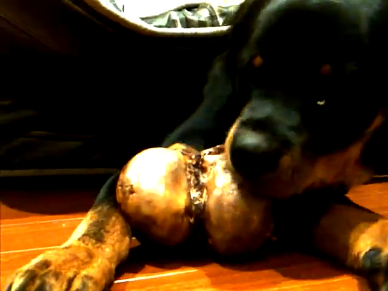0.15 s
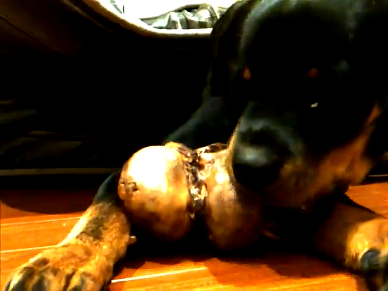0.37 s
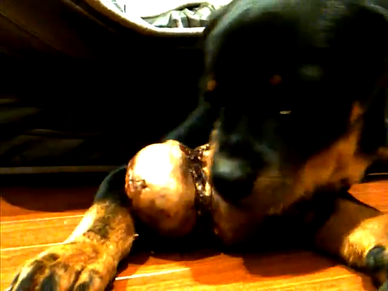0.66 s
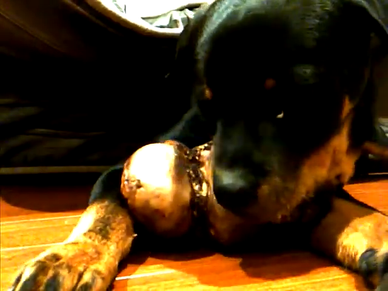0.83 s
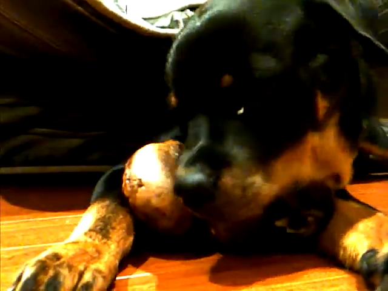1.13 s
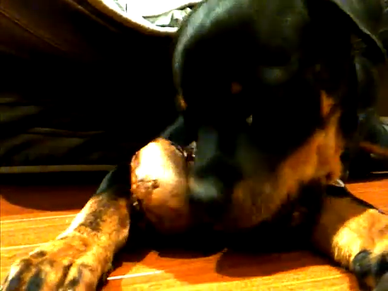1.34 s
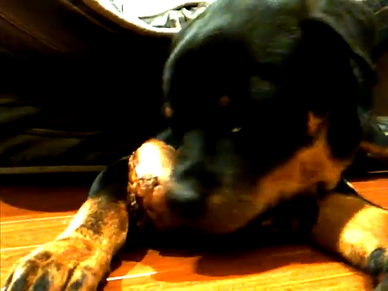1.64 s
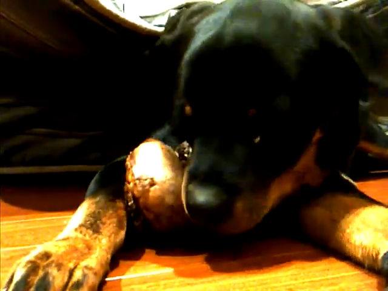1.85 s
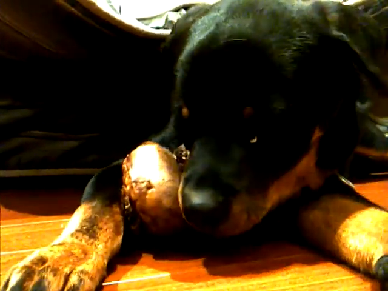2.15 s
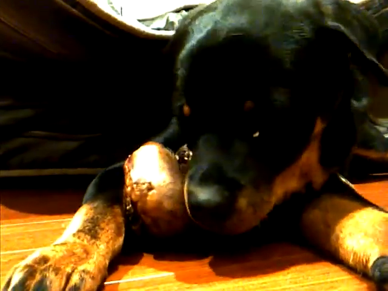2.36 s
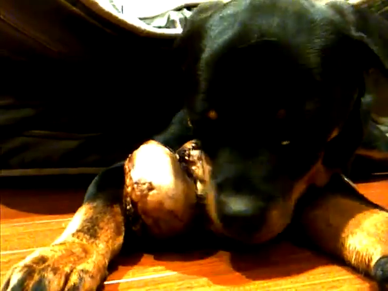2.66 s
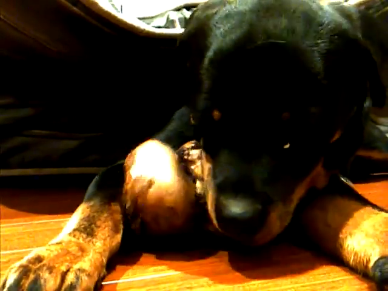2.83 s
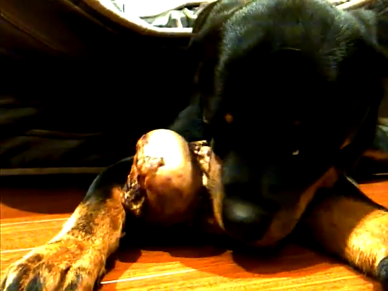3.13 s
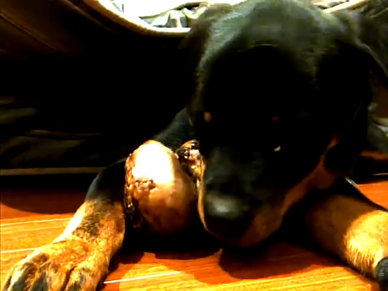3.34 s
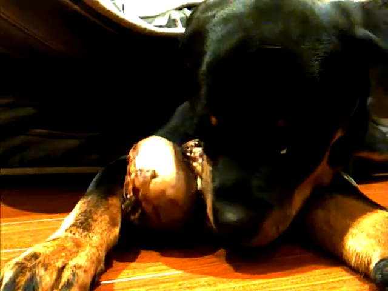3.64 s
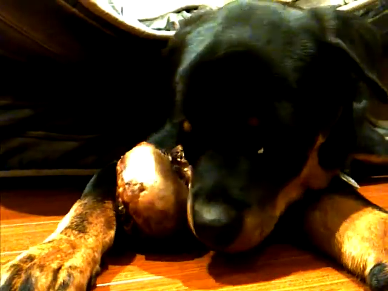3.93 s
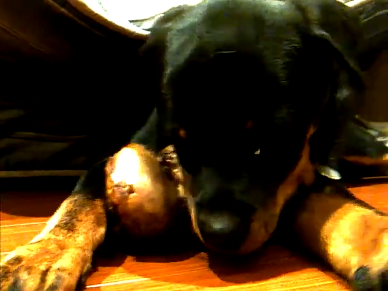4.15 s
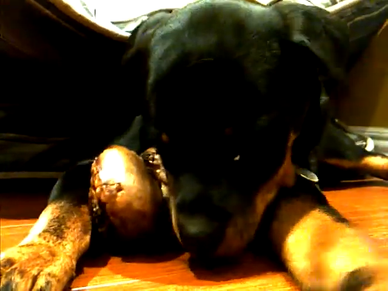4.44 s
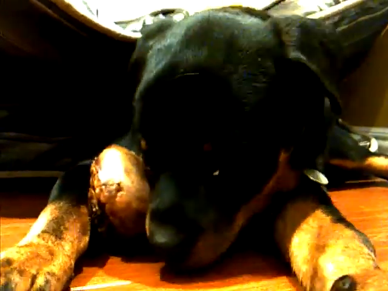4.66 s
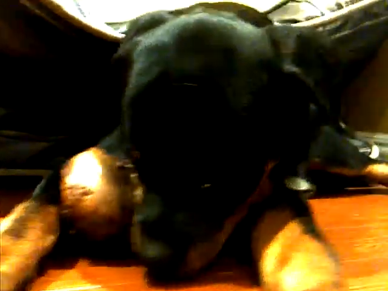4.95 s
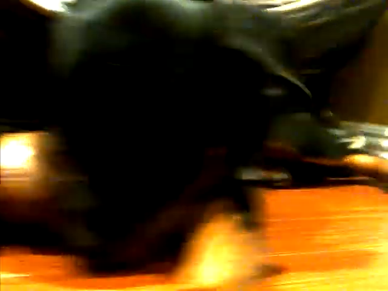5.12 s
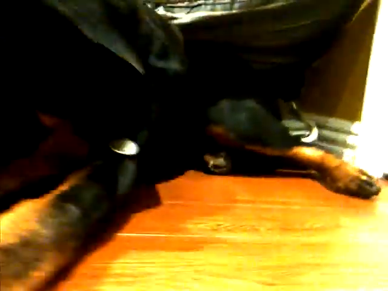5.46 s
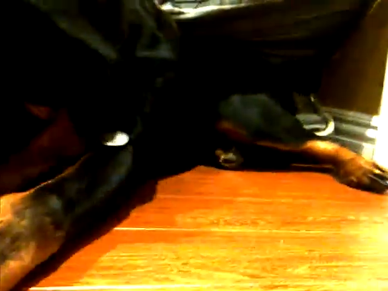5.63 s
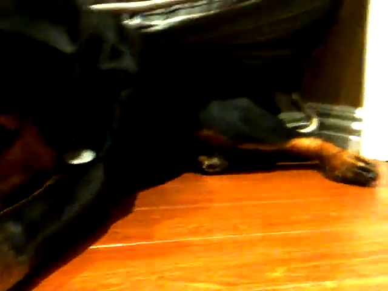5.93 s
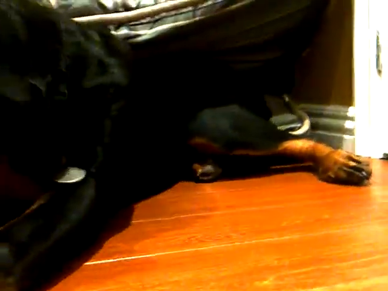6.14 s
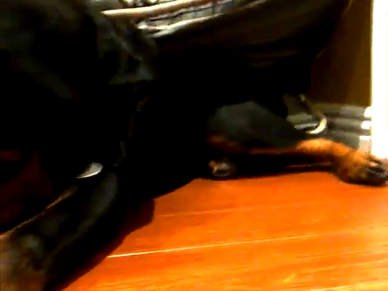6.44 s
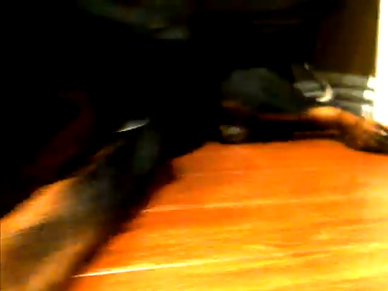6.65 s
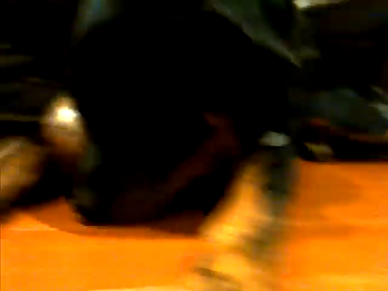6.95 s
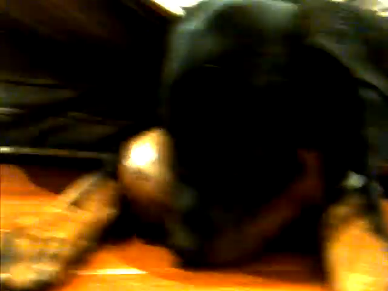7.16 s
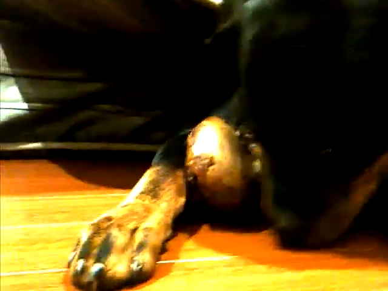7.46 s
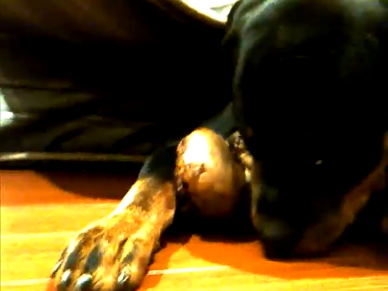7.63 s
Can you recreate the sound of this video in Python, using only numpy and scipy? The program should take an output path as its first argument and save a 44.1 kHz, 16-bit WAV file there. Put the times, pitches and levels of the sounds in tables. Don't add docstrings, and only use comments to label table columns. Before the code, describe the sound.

A young dog chews a large knuckle bone on a laminate floor in a small room. Hollow clunks strike the boards irregularly, loudest from about three to four and a half seconds, between short grinding scrapes, tooth ticks and claw skids. A collar tag tinkles faintly. Later it is sparser, with soft hiss as the camera slides. Close, cheap microphone with dull treble.

```python
import sys
import numpy as np
from scipy import signal
from scipy.fft import rfft, irfft, next_fast_len
from scipy.io import wavfile

SR = 44100
rng = np.random.default_rng(int(sys.argv[2]) if len(sys.argv) > 2 else 0)


def wrap_up_sound(samples):
    columns = np.atleast_2d(samples).T
    tamed = np.clip(columns, -1, 1)
    steps = np.round(tamed * 32767).astype(np.int16)
    wavfile.write(sys.argv[1], SR, steps)


def to_linear_factor(level_db):
    exponent = np.asarray(level_db, float) / 20
    return 10 ** exponent


N = 343539


# start_s, peak_db, thump_db, hardness_db
DROPS = [(.153, -25.5, -14.5, -21.5), (.659, -39, -9, -27), (.696, -25.5, -13.5, -22.5),
         (1.14, -34, -7.5, -18), (1.21, -18, -39, -16.5), (1.378, -12, -23, -18),
         (1.455, -17.5, -17, -19.5), (2.06, -42.5, -11.5, -32), (2.277, -37, -12.5, -24),
         (2.671, -19, -16, -20), (2.907, -29.5, -16, -16), (3.296, -5, -25, -13.5),
         (3.598, -24.5, -6.5, -16.5), (3.85, -4.5, -16, -15.5), (4.073, -21, -12, -22),
         (4.381, -4.5, -20, -16.5), (5.077, -29, -20, -23), (5.553, -27, -6, -19), (6.852, -26, -24, -17),
         (6.871, -31, -26, -26), (7.428, -21, -9.5, -13)]
NUDGES = [(.194, -48, -1, -11), (.344, -35, -4, -47), (.379, -49, -9, -31), (.596, -46, -4, -26),
          (.77, -38.5, -2, -26), (.979, -50, -4, -12.5), (1.077, -54.5, 4.5, -32), (1.323, -37.5, -4, -3.5),
          (1.342, -31.5, -1, -23), (1.407, -33.5, .5, -20), (1.821, -48, -27, -4), (1.846, -41, -6, -17),
          (1.858, -42, -1, -12), (4.239, -44.5, 3, -6), (4.246, -36.5, -.5, -5.5), (4.27, -56, -15, -8),
          (4.987, -45, -4, -10), (5.054, -31.5, 5, -13.5), (5.212, -40.5, -4.5, -18),
          (6.163, -45, -5.5, -6.5), (6.33, -58, -11, -12), (6.658, -28.5, -8, -6.5),
          (7.634, -45, -3.5, -12.5)]
BITES = [(.216, -35, -14, -12), (.263, -34, -7.5, -16), (.3115, -29.5, -14, -7.5), (1.784, -49, 2.5, -35),
         (1.928, -45.5, -5, -3.5), (1.97, -43, -5.5, -5), (2.38, -47.5, -5.5, -10), (2.891, -45, -2, -2.5),
         (4.172, -30.5, -8.5, -16), (4.193, -46, -6, 3), (4.287, -35.5, -18, -7), (4.347, -39.5, 4.5, -11),
         (4.769, -43.5, -4.5, -11), (4.866, -49, -2, 1.5), (6.277, -38.5, -1.5, -17),
         (6.397, -45.5, -11, -3), (6.492, -37.5, -4, 2.5), (6.639, -47, -20, -17)]
# shaft_db at hardness 0, follows (dB per dB of hardness)
KINDS = [
    (-5.5, .75),
    (-17.5, .1),
    (-5.5, .15),
]


def blows():
    rows = []
    for kind, (shaft_db, follows) in zip((DROPS, NUDGES, BITES), KINDS):
        rows += [(*row, shaft_db + follows * row[3]) for row in kind]
    return sorted(rows)


BOARD = [(187.9, -6, 0.066), (251, -2.5, 0.046), (310.4, 3, 0.017)]
BONE = [(411, 1.5, 0.039), (466, 1.5, 0.022), (501.4, -1.5, 0.024)]
SHAFT = [(579, -2, 0.04), (677, 2, 0.036), (715, 4.5, 0.027), (839, 1, 0.0092)]
CONTACT = [(1082, 3, 0.0082), (1246.4, 8.5, 0.0087), (1474, 5.5, 0.0043), (1630, -17, 0.0048),
           (1950, -31.5, 0.004), (2600, -37, 0.023), (3560, -20.5, 0.0027)]
# start_s, peak_db
CRACKS = [(.216, -58), (.263, -62), (.309, -63.5), (.696, -61.5), (1.323, -60.5), (1.455, -55.5),
          (1.784, -54.5), (1.858, -62), (1.928, -60), (2.277, -65), (2.671, -46), (2.907, -54),
          (3.296, -37), (3.598, -54.5), (3.85, -43), (4.193, -67), (4.246, -55.5), (4.287, -63.5),
          (4.381, -29), (4.866, -61), (4.987, -63), (5.077, -63), (5.212, -54), (6.163, -64), (6.492, -52),
          (6.852, -52), (6.871, -57), (7.428, -48)]


def knocks():
    lag_s, spread_db = .0048, 2.2
    s, peak_db, thump_db, hard_db, shaft_db = np.transpose(blows())
    crack_s, crack_db = np.transpose(CRACKS)
    s = s + lag_s
    soft_db = np.minimum(0, .6 * (peak_db + 30))
    thump = band(struck(BOARD, s, peak_db + thump_db + 5.5, spread_db), 140, 600)
    knuckle = struck(BONE, s, peak_db - 10, spread_db)
    shaft = struck(SHAFT, s, peak_db + shaft_db - 2.5, spread_db)
    hollow = band(knuckle + shaft, 240, 940)
    hard = band(struck(CONTACT, s, peak_db + hard_db + soft_db, spread_db), 700, 2200)
    rough = chatter(s, peak_db + hard_db + 7, .061, 900, 1700)
    crack = band(chatter(crack_s + lag_s, crack_db + 4, .03, 2200, 5000), 1800, 6000)
    return thump + hollow + hard + rough + crack


# time_s, level_db
EFFORT = [(0, -52), (.6, -60), (.9, -80), (1.15, -68), (1.66, -59), (1.95, -62), (2.2, -62), (2.58, -70),
          (3.15, -68), (3.6, -55), (3.8, -64), (4.7, -56), (5.2, -60), (5.75, -55), (6.0, -63), (6.75, -58),
          (7.35, -60), (7.79, -59)]


def effort():
    s, db = np.transpose(EFFORT)
    return to_linear_factor(np.interp(np.arange(N) / SR, s, db))


# middle_s, level_db, width_s (per 20 dB either side)
GRINDS = [(.13, -51, .1), (.43, -40, .12), (.79, -43, .09), (1.17, -51, .06), (1.34, -39, .035),
          (2.72, -50, .15), (3.0, -56, .15), (3.5, -37, .12), (3.97, -47, .15), (4.07, -42.5, .2),
          (4.2, -48.5, .2), (4.5, -41, .12), (4.65, -51, .1), (5.76, -51, .12), (6.57, -50, .1),
          (6.92, -50, .15), (7.24, -49, .12), (7.79, -49, .12)]


def grinding():
    jaw = effort() + bouts(GRINDS)
    slips = grains(600, 3.6, 4.2)
    grind = rubbed(BONE + SHAFT + CONTACT, slips, .42)
    return to_linear_factor(-7) * jaw * rms_one(band(grind, 230, 1500))


# middle_s, level_db, width_s (per 20 dB either side)
SHUFFLES = [(.13, -38, .12), (.47, -40, .15), (.74, -44, .07), (1.23, -33, .045), (1.43, -37, .055),
            (1.89, -41, .07), (2.28, -51, .15), (2.75, -42, .1), (3.33, -26, .06), (3.57, -46, .07),
            (4.19, -40, .09), (4.76, -46, .07), (5.01, -54, .2), (5.82, -48, .12), (6.12, -47, .15),
            (7.0, -41, .14), (7.24, -53, .15)]


def shuffling():
    weight = effort() + bouts(SHUFFLES)
    rumble = rubbed(BOARD, grains(120, 1.5, 7.5))
    return to_linear_factor(-10) * weight * rms_one(band(rumble, 130, 300))


# slip_s, level_db, build_s (per 20 dB)
DRAGS = [(.16, -45, .03), (.452, -35.5, .045), (.49, -44, .08), (1.345, -51, .15), (2.72, -47, .08),
         (3.297, -37, .04), (3.611, -41.5, .03), (4.296, -39.5, .07), (5.482, -51, .04), (6.198, -56, .15),
         (6.328, -45, .02), (6.498, -33.5, .026), (6.644, -43, .03), (6.704, -42, .07), (7.546, -38.5, .07)]
# catch_s, level_db, die_s (per 20 dB)
SKIDS = [(.216, -55, .15), (.786, -57, .06), (1.27, -46, .15), (1.786, -48, .045), (1.854, -37, .012),
         (1.87, -57, .13), (2.914, -44.5, .04), (4.17, -46.5, .07), (4.872, -53.5, .045), (4.975, -59, .09),
         (5.778, -48.5, .05), (6.048, -60, .3), (6.37, -45, .011), (6.404, -53, .025), (6.598, -54, .05),
         (6.665, -38, .03), (6.944, -47, .1)]
# pitch_hz, level_db, t60_s
SCRATCH_MODES = [(545, 4, 0.0097), (815, 4, 0.014), (1150, 5.5, 0.0069), (1590, 6, 0.0033),
                 (2050, -4.5, 0.0064), (2310, -13.5, 0.0087), (4000, -17.5, 0.0065), (6040, -15.5, 0.0029)]


def scratching():
    slip_off_s, catch_s = .014, .014
    slips = grains(1500, 6.8, 3.9)
    slip_s, drag_db, build_s = np.transpose(DRAGS)
    at, skid_db, die_s = np.transpose(SKIDS)
    level = swells(slip_s, drag_db, build_s, slip_off_s) + swells(at, skid_db, catch_s, die_s)
    return to_linear_factor(-5) * level * rms_one(band(rubbed(SCRATCH_MODES, slips), 490, 6500))


# start_s, peak_db, pitch_hz
TICKS = [(0.2206, -60, 3010), (0.3148, -33.5, 4590), (0.3465, -44, 5300), (0.4934, -41, 3960),
         (1.5674, -43.5, 5900), (1.6677, -41, 4630), (1.7862, -60, 3760), (4.1969, -50.5, 5540),
         (4.2415, -43.5, 5400), (4.2514, -47, 5490), (4.2707, -52, 3900), (4.2886, -45.5, 5240),
         (4.6668, -47, 3270), (4.8744, -66, 3200), (6.0494, -64, 3770), (6.4961, -62, 4300),
         (6.773, -45, 4740)]


def teeth():
    length = 600
    out, tail = np.zeros(N), np.exp(-np.arange(length) / (.0021 * SR))
    for s, peak_db, hz in TICKS:
        at = int((s + .001) * SR)
        noise = rng.standard_normal(length) * tail
        out[at:at + length] += to_linear_factor(peak_db + 3) * band(noise, .86 * hz, 1.15 * hz)
    return out


# start_s, peak_db
TAG = [(0.3167, -40), (4.1979, -61), (4.2433, -52), (4.2722, -58), (4.2961, -58), (4.3326, -68),
       (6.3225, -53), (6.3699, -59), (6.4063, -58), (6.4862, -58), (6.4956, -47), (6.5294, -52.5),
       (6.6994, -59), (6.772, -53)]
# pitch_hz, level_db, t60_s
TAG_MODES = [(2130, 0, .09), (2215, -3, .06), (2290, -5, .05)]


def tag():
    s, peak_db = np.transpose(TAG)
    rub = chatter(s, peak_db - 19, .03, 1400, 2700)
    return sum(to_linear_factor(db) * ring(rub, hz, t60) for hz, db, t60 in TAG_MODES)


# full_speed_s, level_db, width_s (to lose 20 dB either side)
SLIDES = [
    (5.37, -64.5, .47),
    (7.1, -61, .51),
]
# pitch_hz, level_db (per Hz)
SLIDE_COLOUR = [(350, -29.5), (600, -1.5), (1640, -5.5), (3480, -15.5), (6470, -15.5), (7300, -18),
                (7980, -58), (8430, -53), (11000, -87), (18500, -120)]


def sliding():
    rest_db, rustle_db, roundness = -81.5, -22, 2.9
    speed = to_linear_factor(rest_db) + to_linear_factor(rustle_db) * effort() + bouts(SLIDES, roundness)
    unevenness = to_linear_factor(4.5 + .67 * drift(18))
    return speed * unevenness * coloured(SLIDE_COLOUR)


def drive():
    start_s, ticks_per_s, tick_hz, tick_db = .0325, 23.976, 6500, -62
    whine_hz, whine_db = 6180, -86.5
    beats = np.arange(start_s, N / SR, 1 / ticks_per_s)
    weak = np.arange(len(beats)) % 3 == 2
    strength = to_linear_factor(tick_db - weak + 1.5 * rng.standard_normal(len(beats)))
    ticking = band(ring(clicks(beats, strength), tick_hz, .0041), 5600, 11000)
    whine = rms_one(ring(rng.standard_normal(N), whine_hz, .011))
    return ticking + to_linear_factor(whine_db) * whine


def handling():
    rumble_db, swing_db = -71.5, 2.2
    jolt_s, jolt_db = 3.3012, -19.5
    rumble = rms_one(band(rng.standard_normal(N), 51, 110))
    jolt = signal.lfilter([1], [1, -.9], clicks([jolt_s], to_linear_factor(jolt_db)))
    return to_linear_factor(rumble_db + swing_db * drift(6)) * rumble + jolt


# pitch_hz, level_db (per Hz)
HUSH = [(15, -34.5), (25, -29), (119, -2), (167, 10), (322, -19), (432, -3), (654, -7.5), (794, -13),
        (1230, -13), (5050, -29.5), (5570, -62.5), (6290, -36.5), (7280, -32), (8430, -53), (11000, -96),
        (18500, -120)]


def hush():
    return to_linear_factor(-63) * coloured(HUSH)


# pitch_hz, t60_s
ROOM_T60 = [(100, .3), (300, 0.24), (800, 0.42), (2000, 0.5), (6000, 0.42)]
# pitch_hz, level_db
ROOM_COLOUR = [(100, 0.5), (400, -2), (1200, -3), (2500, -5.5), (6000, -5.5)]


def room(x):
    first_wall_s, thicken_s = .0052, .019
    t = np.arange(SR // 2) / SR
    edges = 90 * 2 ** np.arange(0, 6.6, .5)
    white, tail = rng.standard_normal((2, len(t))), 0
    for k, (low, high) in enumerate(zip(edges, edges[1:])):
        hz = np.sqrt(low * high)
        fade_db = at_hz(ROOM_COLOUR, hz) - 60 * t / at_hz(ROOM_T60, hz)
        tail = tail + band(white[k % 2], low, high) * to_linear_factor(fade_db)
    tail = tail * np.clip((t - first_wall_s) / thicken_s, 0, 1) ** .5
    return signal.fftconvolve(x, tail / np.sqrt(np.sum(tail ** 2)))[:N]


def struck(modes, times, level_db, spread_db):
    chance = rng.standard_normal((len(times), len(modes)))
    out = np.zeros(N)
    for k, (hz, db, t60) in enumerate(modes):
        push = to_linear_factor(level_db + db + spread_db * chance[:, k])
        out += ring(clicks(times, push), hz, t60)
    return out


def rubbed(modes, slips, t60_share=1):
    return sum((-1) ** k * to_linear_factor(db) * ring(slips, hz, t60_share * t60)
               for k, (hz, db, t60) in enumerate(modes))


def chatter(times, level_db, t60, low_hz, high_hz):
    burst = signal.lfilter([1], [1, -to_linear_factor(-60 / (t60 * SR))], clicks(times, to_linear_factor(level_db)))
    return band(burst * rng.standard_normal(N), low_hz, high_hz)


def grains(per_s, size_db, clump_db):
    sizes = to_linear_factor(size_db * np.minimum(rng.exponential(1, N), 4)) * rng.choice([-1, 1], N)
    happens = rng.random(N) < per_s * to_linear_factor(clump_db * drift(25)) / SR
    return sizes * happens


def swells(s, db, rise_s, fall_s, ease=1):
    t = np.arange(0, N + 16, 16)[:, None] / SR
    away = np.maximum((s - t) / rise_s, 0) + np.maximum((t - s) / fall_s, 0)
    gain = to_linear_factor(db - 20 * np.minimum(away, 4) ** ease).sum(axis=1)
    return np.interp(np.arange(N) / SR, t[:, 0], gain)


def bouts(rows, ease=1):
    s, db, wide_s = np.transpose(rows)
    return swells(s, db, wide_s, wide_s, ease)


def ring(x, hz, t60):
    r, w = to_linear_factor(-60 / (t60 * SR)), 2 * np.pi * hz / SR
    return signal.lfilter([0, np.sin(w)], [1, -2 * r * np.cos(w), r * r], x + 1e-18)


def clicks(times, gains):
    out = np.zeros(N)
    np.add.at(out, np.clip((np.asarray(times) * SR).astype(int), 0, N - 1), gains)
    return out


def band(x, low_hz, high_hz):
    return signal.sosfilt(signal.butter(2, [low_hz, high_hz], "band", fs=SR, output="sos"), x + 1e-18)


def coloured(spectrum):
    size = next_fast_len(N)
    hz = np.maximum(np.arange(size // 2 + 1) * SR / size, 1)
    shaped = rfft(rng.standard_normal(size)) * to_linear_factor(at_hz(spectrum, hz))
    return rms_one(irfft(shaped, size)[:N])


def drift(rate_hz):
    low = signal.butter(2, rate_hz, fs=SR, output="sos")
    return rms_one(signal.sosfilt(low, rng.standard_normal(N + SR))[SR:])


def rms_one(x):
    return x / np.sqrt(np.mean(x ** 2) + 1e-20)


def at_hz(points, hz):
    table_hz, values = np.transpose(points)
    return np.interp(np.log(hz), np.log(table_hz), values)


def scene():
    ticks = teeth()
    near = knocks() + grinding() + shuffling() + scratching() + tag()
    no_bass = signal.butter(5, 148, "high", fs=SR, output="sos")
    near = signal.sosfilt(no_bass, near)
    walls = room(near + to_linear_factor(-3.5) * ticks)
    camera = sliding() + drive() + handling() + hush()
    return (near + ticks + to_linear_factor(-12) * walls + camera)[None, :]


def thin_treble(x):
    short_share, quiet_share, band_hz = .3, .62, 420
    hz, _, z = signal.stft(x, SR, nperseg=2048)
    frames = z.shape[1]
    treble = np.abs(z[(hz > 2500) & (hz < 7000)]).mean(axis=0)
    short = np.repeat(rng.random(frames) < short_share, 2)[:frames]
    short = short & (treble < np.quantile(treble, quiet_share))
    lowest_hz = np.repeat(rng.uniform(2800, 5200, frames), 2)[:frames]
    for low in np.arange(3000, 8000, band_hz):
        rows = (hz >= low) & (hz < low + band_hz)
        size = np.abs(z[rows])
        chance = np.repeat(rng.random(frames) < .7, 2)[:frames]
        dropped = short & (low > lowest_hz) & chance
        strongest = size > .8 * size.max(axis=0)
        z[rows] *= ~dropped | strongest
    return signal.istft(z, SR, nperseg=2048)[1][:N]


def roll_off(x):
    return signal.sosfilt(signal.butter(12, 8580, fs=SR, output="sos"), x)


def record(dry):
    steep_top = signal.butter(10, 7000, fs=SR, output="sos")
    heard = signal.sosfilt(steep_top, dry)
    mix = thin_treble(heard[0])[None, :]
    return roll_off(mix)


dry = scene()
out = record(dry)
wrap_up_sound(out)
```